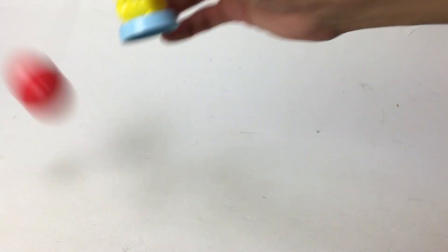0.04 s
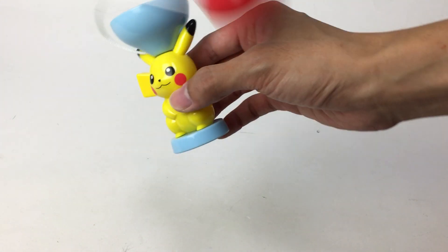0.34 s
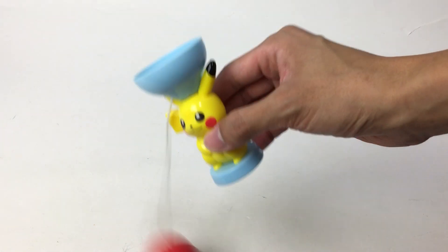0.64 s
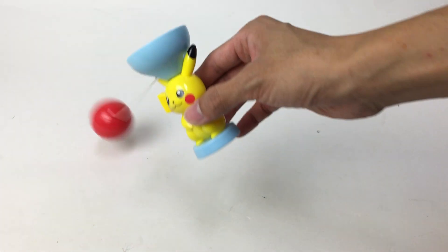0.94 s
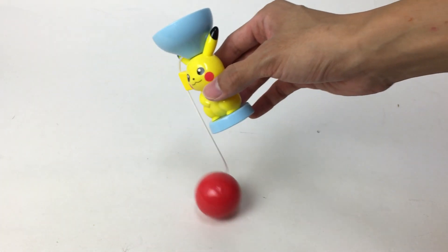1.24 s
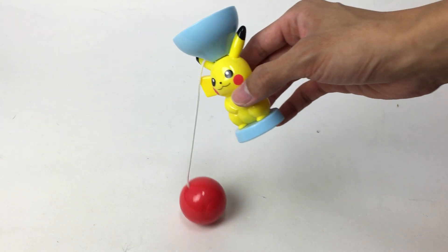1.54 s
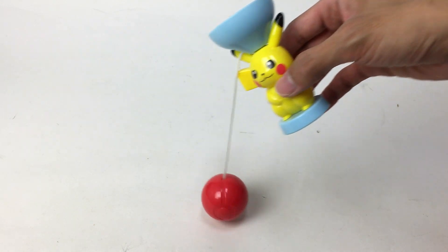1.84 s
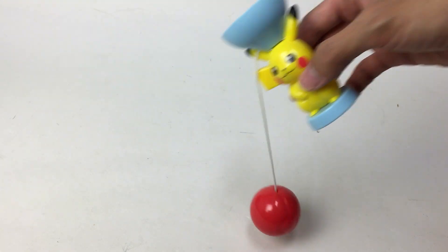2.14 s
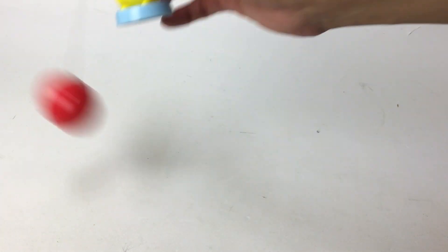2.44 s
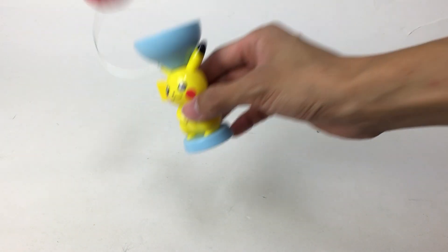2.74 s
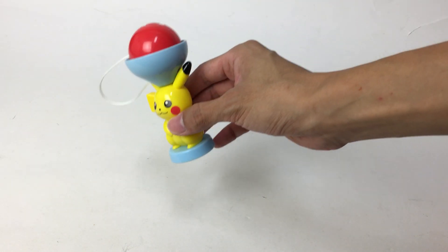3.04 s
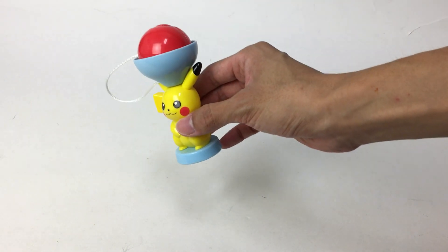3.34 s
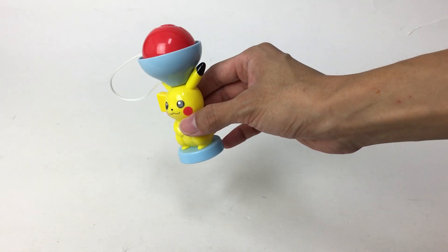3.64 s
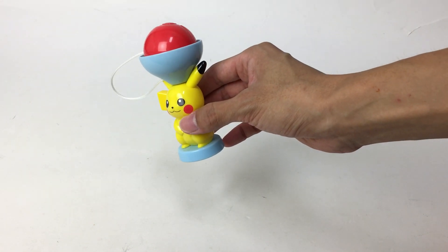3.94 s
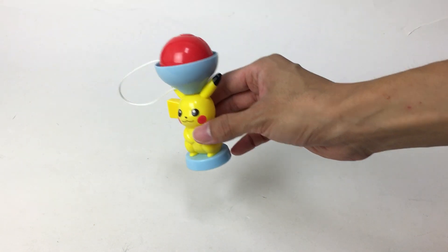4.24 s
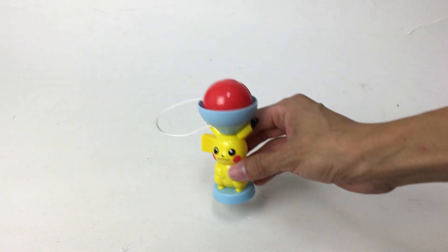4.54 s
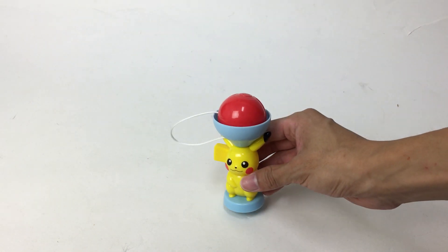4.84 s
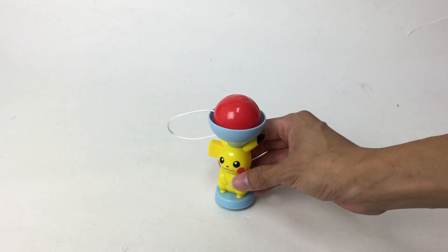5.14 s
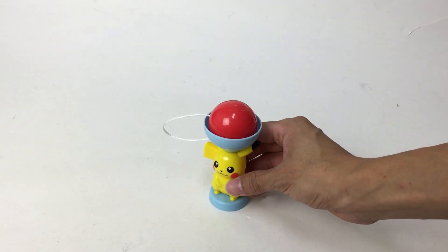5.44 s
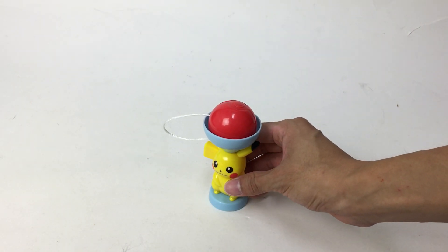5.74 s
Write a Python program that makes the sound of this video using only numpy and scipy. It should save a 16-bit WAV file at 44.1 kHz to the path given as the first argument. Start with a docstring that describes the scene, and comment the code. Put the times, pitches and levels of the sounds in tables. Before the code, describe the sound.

In a small quiet room with a short echo and a soft low rumble, a nearby microphone picks up a cup-and-ball toy. A crisp snap of string comes first, then two hollow thuds of the wooden ball on a tabletop, with small bounces and a brief roll. A pause follows before the ball lands in the plastic cup with a bright clack and settles. Last, the toy's base meets the table with a soft bump and faint rub.

```python
"""A wooden ball on a string thuds on a table and clacks into the plastic cup of a cup-and-ball toy.
The string snaps tight, then the ball hits the table, making the top ring, and bounces and rolls.
Tossed up, it lands in the thin cup and rattles to rest, with a faint hiss. The toy is set down and
slides a little. It is all close by, in a small quiet room with a short echo and a low rumble."""
import sys
import numpy as np
from scipy import signal
from scipy.fft import rfft, irfft
from scipy.io import wavfile

SR = 44100
rng = np.random.default_rng(int(sys.argv[2]) if len(sys.argv) > 2 else 0)


def persist_wave(psi):
    """Save psi, clipped to +-1, as 16-bit WAV."""
    counts = np.round(np.clip(psi, -1, 1) * 32767).astype(np.int16)
    wavfile.write(sys.argv[1], SR, np.atleast_2d(counts).T)


N = 265041
AGE = np.arange(SR // 2) / SR  # seconds since a hit

# The notes the table top rings with: pitch_hz, level_db, fade_s
TABLE_NOTES = [(55.5, -23, 0.17), (102.6, -12.5, 0.14), (122.6, -15.5, .14), (170, -23, .08),
               (221, -23.5, 0.18), (261.3, -7.5, 0.11), (280.4, -15, 0.059), (336.3, -14.5, 0.14),
               (384, -17.5, 0.14), (417.5, -21.5, 0.18), (505, -16.5, 0.06), (597.7, -23.5, 0.16),
               (688, -22, 0.1), (793.4, -25.5, 0.077), (939, -27, 0.048), (965, -22.5, 0.053),
               (1286, -31, 0.047), (1410, -30.5, 0.047)]
# The table's crack, many notes too close to tell apart: pitch_hz, level_db
TABLE_CRACK_COLOUR = [(100, 9.5), (250, -7), (700, 0.5), (1200, -3), (1900, -16.5), (2900, -13.5),
                      (4000, -21), (6000, -37), (8000, -36.5), (12000, -34), (16000, -34.5)]
# The ball or the toy's base hits the table: start_s, level_db, bend_pitch_hz, bend_db, cutoff_hz
TABLE_HITS = [(-.007, -22.5, 300.7, -20, 1200), (0.7414, -9.5, 297, -4, 15500),
              (1.1077, -9, 516, -5, 12300), (1.1089, -21.5, 120, -12, 1460),
              (1.3307, -31.5, 300, -22.5, 1080), (1.596, -42, 222, -43, 400),
              (1.7364, -38, 352, -39.5, 480), (1.795, -47, 244, -57, 690), (2.065, -48, 130, -47, 400),
              (5.036, -38, 115, -27, 400)]


def table_thuds():
    """Each hit bends the table top and makes it ring. Softer contact sounds duller."""
    out = np.zeros(N)
    for start_s, level_db, bend_pitch_hz, bend_db, cutoff_hz in TABLE_HITS:
        notes = ring(TABLE_NOTES, delay_s=0.00082, scatter_db=1.5)
        crack = noise(TABLE_CRACK_COLOUR, len(AGE)) * (fade(0.025) + gain(-14.5) * fade(0.15))
        thud = gain(bend_db) * bend(bend_pitch_hz, swings=1.17)
        thud += gain(level_db) * (notes + gain(-11) * crack)
        dulled = filtered(thud, cutoff_hz, "low")
        add(out, start_s, filtered(dulled, cutoff_hz, "low"))  # twice, for a steeper cut
    return filtered(out, 35, "high")  # a flat board gives off little deep bass


# The notes the plastic cup rings with: pitch_hz, level_db, fade_s
CUP_NOTES = [(360, -25, 0.063), (880.5, -15.5, 0.033), (1088, -22.5, .02), (1400, -12, 0.027),
             (1584, -10, .03), (1770, -15.5, .03), (2094, -15, 0.04), (2405, -18, 0.039), (2630, -12, .025),
             (2765, -11.5, 0.014), (4090, -19, .025), (4960, -20, 0.048), (5510, -19.5, 0.044),
             (5470, -19, 0.046), (6000, -17, .04), (6480, -14, .022), (7230, -19.5, 0.013),
             (8720, -15.5, 0.032), (12240, -18.5, .018)]
# The cup's crack, many notes too close to tell apart: pitch_hz, level_db
CUP_CRACK_COLOUR = [(200, -22), (700, -10.5), (1500, -5), (2800, -2.5), (4200, -6.5), (4800, -10),
                    (6200, 3.5), (8000, -4.5), (10500, -5), (13000, -2), (16000, -6)]
# The ball lands and rattles in the cup: start_s, crack_db, bend_pitch_hz, bend_db, ring_db
CUP_HITS = [(2.899, -16, 2660, -10.5, -27.5), (2.9183, -24, 2700, -33, -26),
            (2.9281, -15.5, 1417, -18, -24.5), (2.9291, -23.5, 2060, -23, -26.5),
            (2.9315, -22, 1645, -17.5, -23), (3.0348, -42.5, 2820, -40.5, -44),
            (3.0605, -40.5, 2800, -37.5, -58), (3.0633, -66, 1150, -40, -36.5),
            (3.1179, -59, 2790, -49, -42.5), (3.2022, -41.5, 1540, -42, -38.5)]


def cup_clacks():
    """Hard wood hits thin plastic: a crack, a hollow knock as the wall bends, and a short ring."""
    out = np.zeros(N)
    for start_s, crack_db, bend_pitch_hz, bend_db, ring_db in CUP_HITS:
        notes = ring(CUP_NOTES, delay_s=0.0003, scatter_db=2.5)
        crack = noise(CUP_CRACK_COLOUR, len(AGE)) * (fade(0.0034) + gain(-11) * fade(0.035))
        knock = bend(bend_pitch_hz, swings=4.0)
        clack = gain(bend_db) * knock + gain(ring_db) * notes + gain(crack_db) * crack
        cutoff_hz = 22000 * gain(crack_db) ** 0.15  # harder hits are brighter
        add(out, start_s, filtered(clack, cutoff_hz, "low"))
    return filtered(out, 330, "high")  # the cup is too small to give off bass


# The tone all the ticks share: pitch_hz, level_db
TICK_NOISE_COLOUR = [(120, -16), (330, 11), (800, 0.5), (1300, 2), (2200, 2), (3700, -7.5), (5300, -1),
                     (7500, -4.5), (11000, -5), (13000, -7), (16000, -12)]
# Ticks of the string, the hard ball and the handled toy: start_s, level_db, fade_s, pitch_hz, boost_db
TOY_TICKS = [(0.4684, -28.5, 0.0093, 11100, 0), (.4707, -42.5, 0.03, 8900, -10),
             (0.5362, -54.5, .013, 5800, -6), (0.556, -64.5, 0.097, 13000, -3),
             (.7414, -43, 0.015, 2930, 20.5), (1.1049, -35, 0.018, 5800, -0.5),
             (1.33, -67, 0.015, 3500, 11), (1.503, -76, .037, 2300, 15), (2.062, -71.5, .12, 2600, 10.5),
             (2.547, -76.5, .05, 2180, 21), (2.584, -66.5, 0.089, 6000, -8), (2.607, -69, 0.27, 2350, 2),
             (4.4453, -62.5, 0.016, 2090, 14), (4.4785, -68.5, .03, 2120, 10),
             (5.0353, -64.5, .015, 2800, 9.5)]


def toy_ticks():
    """The string jerks and slides, and hard parts touch. Each part favours its own pitch."""
    out = np.zeros(N)
    for start_s, level_db, fade_s, pitch_hz, boost_db in TOY_TICKS:
        tick = noise(TICK_NOISE_COLOUR, len(AGE)) * fade(fade_s)
        favoured = filtered(tick, [pitch_hz / 1.15, pitch_hz * 1.15], "band")
        add(out, start_s, gain(level_db) * (tick + gain(boost_db) * favoured))
    return out


# The table's rumble under the ball: pitch_hz, level_db
ROLL_RUMBLE_COLOUR = [(40, -22), (90, 1), (125, 7), (190, -11), (300, -7.5), (500, -29.5), (1000, -40),
                      (3000, -54), (8000, -61.5)]
# The ball rolls until the string stops it: start_s, length_s, level_db
BALL_ROLLS = [(1.144, 0.11, -40.5), (1.508, .18, -58)]


def ball_rolls():
    """The table rumbles under the rolling ball and gets quieter as the ball slows."""
    loudness = sum(gain(level_db) * swell(start_s, length_s, rise_s=0.0316, fade_s=4.1 * length_s)
                   for start_s, length_s, level_db in BALL_ROLLS)
    return noise(ROLL_RUMBLE_COLOUR, N) * loudness


# Plastic rubbing on the table: pitch_hz, level_db
RUB_COLOUR = [(300, -13), (850, -1.5), (1300, 1.5), (1700, -3), (2100, 1), (2900, -11.5), (3400, -2),
              (3800, -24.5), (12000, -29.5)]
# The toy is set down, then straightened: start_s, level_db
BASE_SLIDES = [(5.036, -67.5), (5.339, -78)]


def base_slides():
    """The toy's base rubs on the table: a short push, then friction stops it."""
    loudness = sum(gain(level_db) * swell(start_s, length_s=0.03, rise_s=0.02, fade_s=0.73)
                   for start_s, level_db in BASE_SLIDES)
    return noise(RUB_COLOUR, N) * loudness


# The thin hiss after the catch: pitch_hz, level_db
THIN_HISS_COLOUR = [(500, -29.5), (900, -8), (1400, -3), (2400, -1), (4200, -8.5), (5800, -5), (9000, -8.5),
                    (13000, -10.5), (16000, -14.5)]


def thin_hiss():
    """A faint, even hiss holds while the ball settles, then stops."""
    loudness = swell(start_s=2.9, length_s=0.44, rise_s=0.03, fade_s=0.029)
    return gain(-66) * noise(THIN_HISS_COLOUR, N) * loudness


def room_echo(sound):
    """Nearby walls add a blur of echoes that builds up fast and soon dies away."""
    colour = [(100, -9.5), (400, -1.0), (900, 1.0), (1450, -4), (2200, 3.0), (2700, -2),
              (4000, -0.5), (7000, 0.5), (11000, -2.5), (16000, 0)]  # pitch_hz, level_db
    build_up = 1 - np.exp(-(AGE / 0.0034) ** 2)
    echoes = noise(colour, len(AGE)) * fade(0.17) * build_up
    return sound + gain(-12) * signal.fftconvolve(sound, echoes / np.linalg.norm(echoes))[:N]


# The quiet room's background: pitch_hz, level_db
ROOM_COLOUR = [(12, -41), (20, -8.5), (38, -3.5), (93, 0.5), (123, -5.5), (154, -9.5), (301, -17),
               (347, -17), (446, -24.5), (660, -25), (825, -28.5), (1030, -29), (3070, -39.5),
               (12400, -46.5), (16000, -50)]


def room_rumble():
    """A soft, low rumble fills the room the whole time."""
    return gain(-58.5) * noise(ROOM_COLOUR, N)


def ring(notes, delay_s, scatter_db):
    """A struck object's fading notes. Low ones travel slower and come later; delay_s is for 1000 Hz."""
    pitch_hz, level_db, fade_s = np.transpose(notes)[:, :, None]
    level_db = level_db + scatter_db * rng.standard_normal(pitch_hz.shape)  # each hit finds a new spot
    age = np.maximum(AGE - delay_s * np.sqrt(1000 / pitch_hz), 0)
    waves = gain(level_db) * np.sin(2 * np.pi * pitch_hz * age) * fade(fade_s, age)
    return waves[::2].sum(axis=0) - waves[1::2].sum(axis=0)  # every other note swings the opposite way


def bend(pitch_hz, swings):
    """The struck spot swings a few times while the wave spreads away from it."""
    turns = pitch_hz * AGE
    return np.sin(2 * np.pi * turns) * (1 - np.exp(-2 * turns)) * np.exp(-turns / swings)


def gain(level_db):
    """Turn decibels into a number to multiply a sound by."""
    return 10 ** (np.asarray(level_db) / 20)


def fade(fade_s, age=AGE):
    """Loudness that drops by 60 dB every fade_s seconds."""
    return np.exp(-np.log(1000) * age / fade_s)


def swell(start_s, length_s, rise_s, fade_s):
    """Loudness that rises, holds until length_s is over, then fades."""
    age = np.arange(N) / SR - start_s
    return np.clip(age / rise_s, 0, 1) * fade(fade_s, np.maximum(age - length_s, 0))


def noise(colour, size):
    """Noise of strength 1. Its colour says how strong each pitch is next to the others."""
    pitch_hz, level_db = np.transpose(colour)
    all_hz = np.maximum(np.fft.rfftfreq(size, 1 / SR), 1)
    shape = gain(np.interp(np.log(all_hz), np.log(pitch_hz), level_db))
    sound = irfft(rfft(rng.standard_normal(size)) * shape, size)
    return sound / sound.std()


def filtered(sound, cutoff_hz, keep):
    """Keep the "low" pitches, the "high" ones or a "band" between two cutoffs."""
    order = 1 if keep == "band" else 2
    sections = signal.butter(order, np.clip(cutoff_hz, 10, 0.45 * SR), keep, fs=SR, output="sos")
    return signal.sosfilt(sections, sound)


def add(track, start_s, sound):
    """Mix a sound into the track at start_s."""
    start = int(round(start_s * SR))
    first, last = max(start, 0), min(start + len(sound), N)
    track[first:last] += sound[first - start:last - start]


def scene():
    """Mix the echoing hits with the rolling, sliding, hiss and rumble in one channel."""
    hits = room_echo(table_thuds() + cup_clacks() + toy_ticks())
    return (hits + ball_rolls() + base_slides() + thin_hiss() + room_rumble())[None]


def record(dry):
    """A nearby phone picks up the sound and cuts the very highest pitches."""
    cutoff_hz = 16300
    return signal.sosfilt(signal.ellip(10, 0.2, 80, cutoff_hz, fs=SR, output="sos"), dry)


dry = scene()
out = record(dry)
persist_wave(out)
```